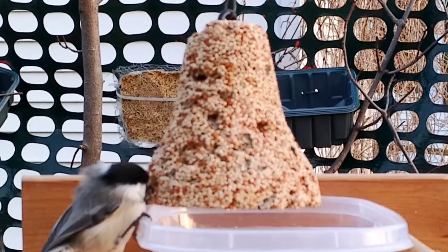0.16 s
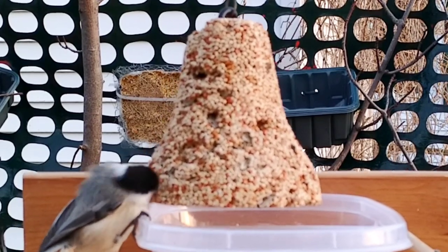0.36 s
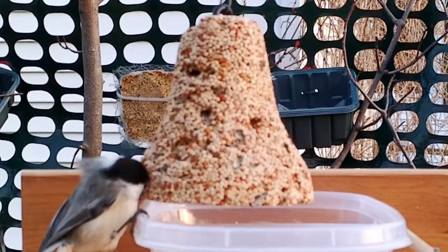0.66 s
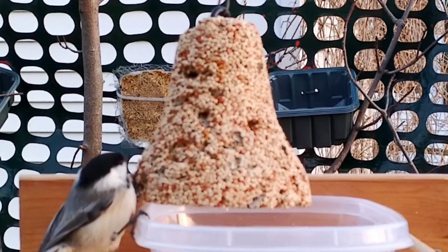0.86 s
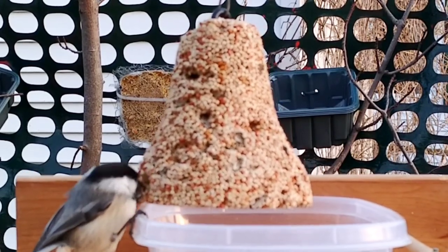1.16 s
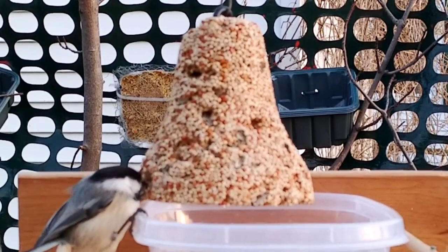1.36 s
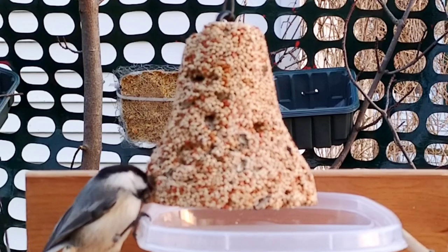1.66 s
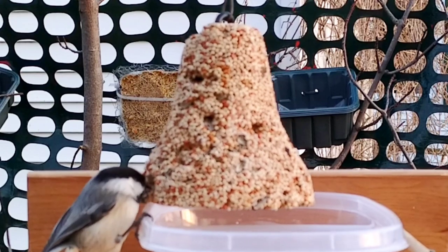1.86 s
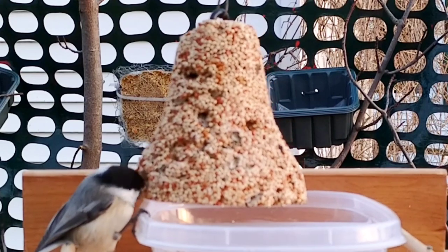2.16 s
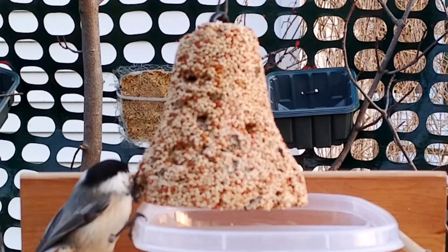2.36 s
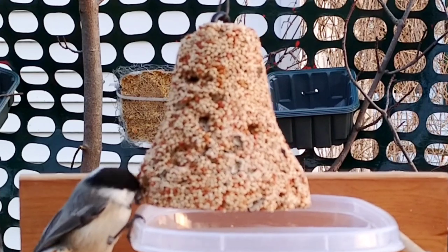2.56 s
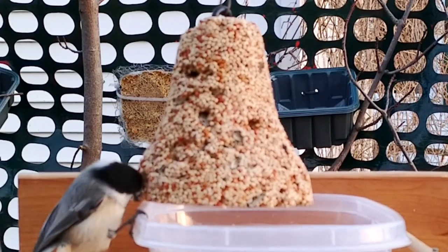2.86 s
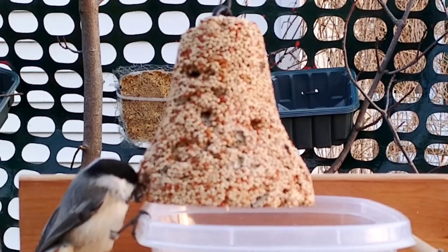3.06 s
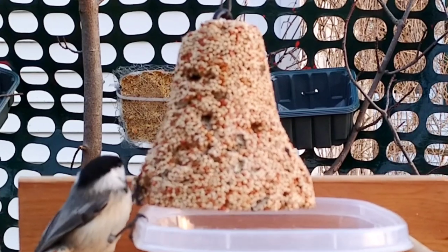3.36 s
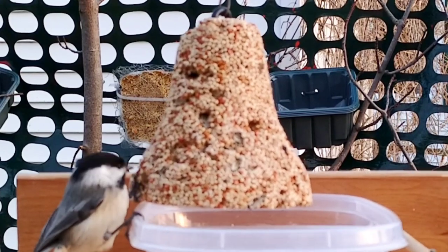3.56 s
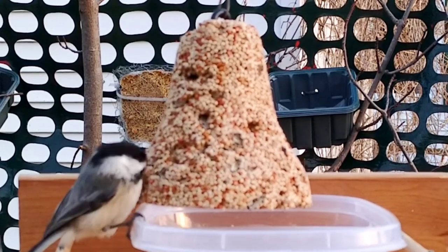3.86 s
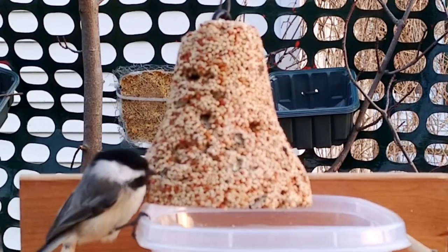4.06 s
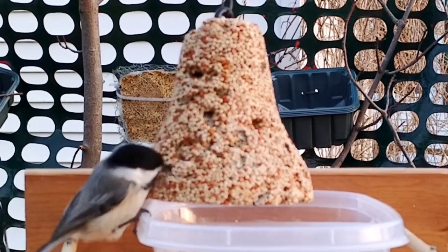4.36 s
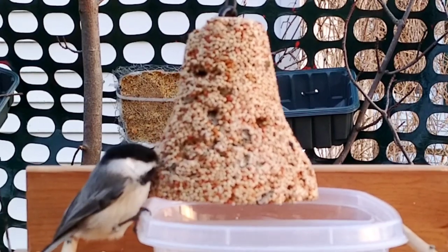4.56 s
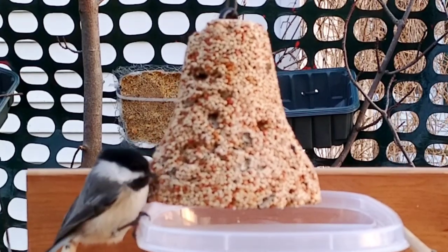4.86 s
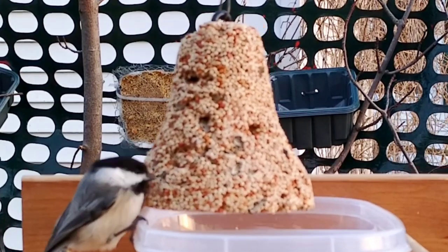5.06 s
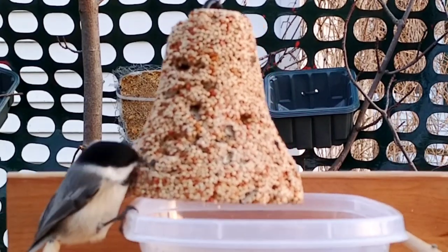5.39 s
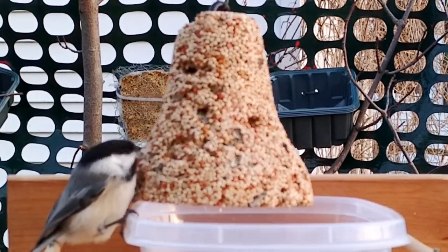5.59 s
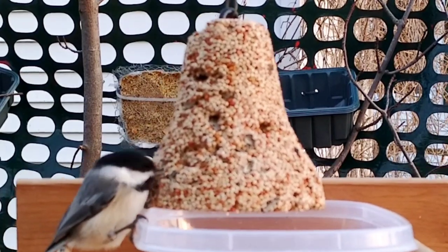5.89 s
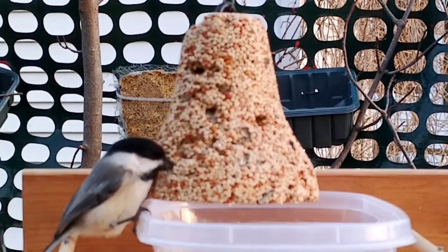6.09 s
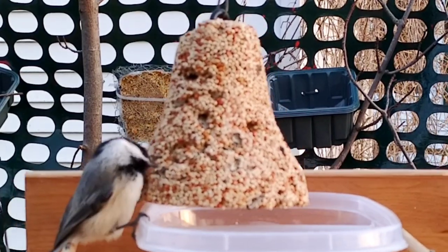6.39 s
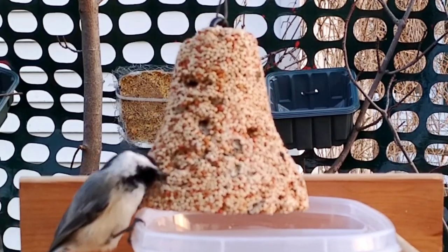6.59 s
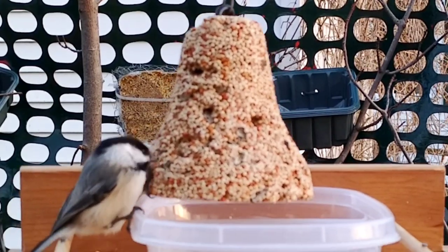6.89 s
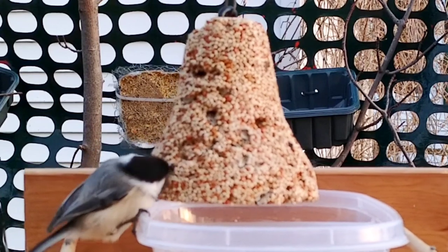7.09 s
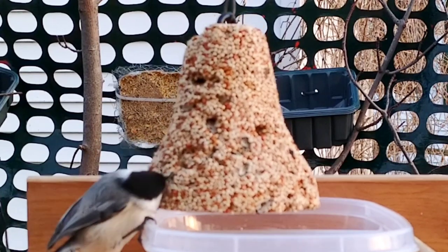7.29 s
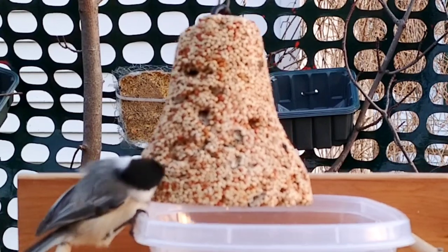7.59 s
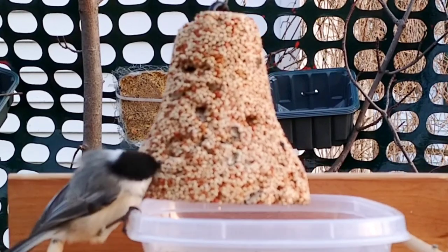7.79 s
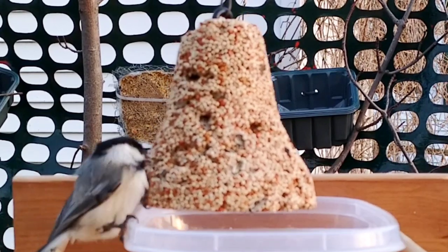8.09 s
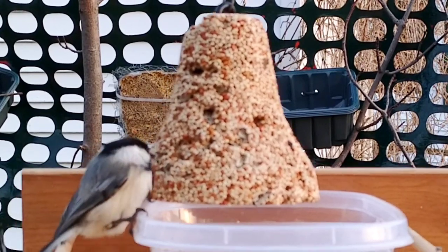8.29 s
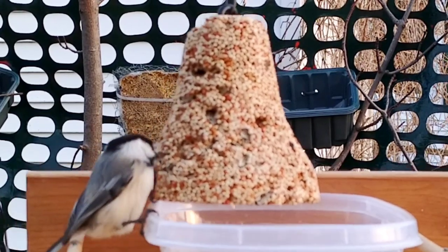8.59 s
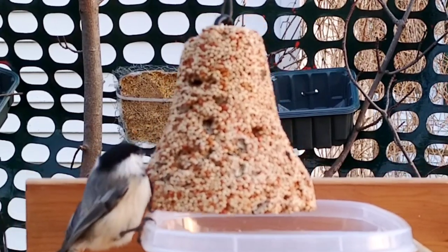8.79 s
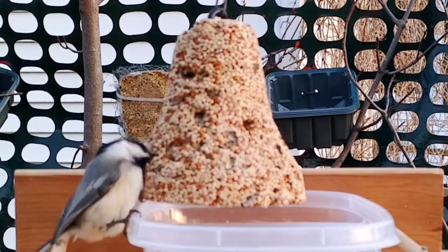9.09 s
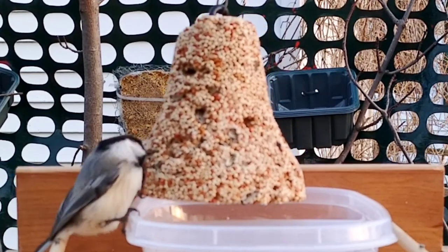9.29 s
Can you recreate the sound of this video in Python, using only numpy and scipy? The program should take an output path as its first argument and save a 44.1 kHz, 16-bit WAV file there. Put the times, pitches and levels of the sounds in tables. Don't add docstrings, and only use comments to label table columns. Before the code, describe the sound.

A chickadee-type bird and neighbours around a seed feeder: isolated piercing chips first, with a brief low wind rumble, then sweet high-low whistles farther off and quick runs of faint falling notes. Near the end come four fast downward slides and three harsh rasping buzzes, the loudest sounds, then distant chirps again. Fences and walls add short echoes; quiet traffic, leaves and dry seed ticks sit behind, with noise reduction pumping the background.

```python
import sys
import numpy as np
from scipy import signal
from scipy.fft import rfft, irfft, next_fast_len
from scipy.io import wavfile
from scipy.ndimage import uniform_filter1d

SR = 44100
rng = np.random.default_rng(int(sys.argv[2]) if len(sys.argv) > 2 else 0)


def volts_from_decibels(level):
    exponent = np.asarray(level, float) / 20
    return 10 ** exponent


def inscribe(sig):
    pcm = np.round(np.clip(np.atleast_2d(sig).T, -1, 1) * 32767)
    wavfile.write(sys.argv[1], SR, pcm.astype(np.int16))


N = 416744
TIME = np.arange(N) / SR


def colour(x, points):
    hz, db = np.transpose(points)
    n = next_fast_len(len(x), True)
    f = np.log(np.arange(n // 2 + 1) * SR / n + 1)
    return irfft(rfft(x, n) * volts_from_decibels(np.interp(f, np.log(hz), db)), n)[:len(x)]


def walk(rate):
    k = int(SR / rate)
    steps = np.repeat(rng.standard_normal(N // k + 1), k)
    return 1.337 * uniform_filter1d(uniform_filter1d(steps, k), k)[:N]


def add(out, start, hz, gain, overtone_db, ratio=2):
    phase = 2 * np.pi * np.cumsum(hz) / SR
    i = int(start * SR)
    note = gain * (np.sin(phase) + volts_from_decibels(overtone_db) * np.sin(ratio * phase))
    out[i:i + len(hz)] += note[:N - i]


def span(start, end):
    return np.linspace(0, 1, int((end - start) * SR))


def slap(x, delay_s, db):
    return x + volts_from_decibels(db) * np.roll(x, int(delay_s * SR))


def echoes(x, early_db, early_t60, late_db, late_t60):
    t = TIME[:SR]
    sparse = rng.standard_normal(SR) * (rng.random(SR) < .05) * volts_from_decibels(-60 * t / early_t60)
    dense = rng.standard_normal(SR) * volts_from_decibels(-60 * t / late_t60) * np.minimum(t / 0.042, 1)
    tail = volts_from_decibels(early_db) * sparse / np.linalg.norm(sparse) + volts_from_decibels(late_db) * dense / np.linalg.norm(dense)
    tail = colour(tail, [(8200, 0.5), (11000, -5), (15000, -9)])
    return x + signal.fftconvolve(x, tail)[:N]


def chips(table, bottom, drop_s=0.0081, drop_db=-9.5, climb=3.6, bend=1.3):
    out = np.zeros(N)
    for start, drop, hz0, top, db in table:
        u, v = span(start, drop), span(0, drop_s)
        rise_hz = top - (top - hz0) * (1 - u) ** climb
        drop_hz = top * (1 - (1 - bottom) * v ** bend)
        swell = np.minimum(u / .08, 1) * np.minimum(.4 + u / .7, 1) * (1 - .3 * u ** 3)
        fall = volts_from_decibels(drop_db + 0.26 * (db + 27.5)) * (1 - v ** 2.6)
        shape = uniform_filter1d(np.r_[swell, fall], size=64)
        octave_db = np.r_[-30 + 14 * u, -25 + 17 * v] + .9 * (db + 28)
        add(out, start, np.r_[rise_hz, drop_hz], volts_from_decibels(db) * shape, octave_db)
    return out


def notes(table, peak, sharp, overtone_db, ratio=2):
    out = np.zeros(N)
    for start, end, a, b, c, db in table:
        u = span(start, end)
        hz = a * (1 - u) * (1 - 2 * u) + 4 * b * u * (1 - u) + c * u * (2 * u - 1)
        shape = np.sin(np.pi * u ** (np.log(.5) / np.log(peak))) ** sharp
        add(out, start, hz, volts_from_decibels(db) * shape, overtone_db - 70 * np.abs(u - .36), ratio)
    return out


def even_glides(table):
    return [(s, e, a, (a + c) / 2, c, db) for s, e, a, c, db in table]


def whistles(table, lift_hz, settle_s, sag_hz_s, slope_db, catch_db):
    out, waver = np.zeros(N), walk(27.26)
    for start, end, hz, db, peak in table:
        u = span(start, end)
        t, i = u * (end - start), int(start * SR)
        edge = np.clip(np.minimum(t / 3, end - start - t) / 0.0033, 0, 1)
        catch = catch_db * np.exp(-((t - .105) / 0.029) ** 2)
        level_db = db - slope_db * np.abs(u - peak) - catch
        settling = lift_hz * np.exp(-(t / settle_s) ** 1.5)
        pitch = hz + settling - sag_hz_s * t + 14 * waver[i:i + len(t)]
        add(out, start, pitch, np.sqrt(2) * edge * volts_from_decibels(level_db), -40.)
    return out


def town():
    # pitch in Hz, level in dB per Hz.
    town_colour = [(30, -94.5), (100, -87.5), (250, -95.5), (400, -99), (850, -92.5), (1300, -99),
                   (1600, -97), (2200, -104), (3000, -110), (5000, -114), (7600, -112), (8500, -120),
                   (12000, -123), (15500, -130)]
    # time in seconds, level in dB.
    town_swell = [(0, -1), (.6, -2.5), (1.2, -0.5), (1.8, -1), (2.4, 0.5), (3, -1), (3.6, 0), (3.95, 0),
                  (4.3, 0), (4.6, 1), (5, -1.5), (5.6, -1), (6.2, -0.5), (6.9, 0), (7.6, -1), (8.1, 0),
                  (8.7, 0.5), (9.45, 2.5)]
    rest, out = colour(rng.standard_normal(N), town_colour) * np.sqrt(SR / 2), 0
    for edge in 350 * 2 ** np.arange(4):
        low = signal.lfilter(*signal.butter(1, edge, fs=SR), rest)
        out = out + low * volts_from_decibels(1.92 * walk(11) + .7 * walk(4))
        rest = rest - low
    out = out + rest * volts_from_decibels(2. * walk(11))
    return out * volts_from_decibels(np.interp(TIME, *np.transpose(town_swell)) + 1.3 * walk(9))


def wind():
    # time of the peak in seconds, level in dB, fading in dB per second.
    gust_table = [
        (0.682, -34, 135.5),
        (0.89, -31, 150.5),
        (1.1, -42, 17),
        (1.71, -51, 68),
        (3.68, -50, 31.5),
        (4.32, -51.5, 250),
        (4.6, -56, 7),
    ]
    # pitch in Hz, level in dB.
    wind_colour = [(20, -32.5), (45, -8), (95, -1.5), (150, -4.5), (230, -18.5), (330, -34), (420, -43),
                   (490, -27.5), (570, -52), (2000, -110)]
    rise_db_s, breeze_db, lull_s = 119.5, -64.5, 1.324
    power = volts_from_decibels(2 * breeze_db)
    for peak_s, db, fade_db_s in gust_table:
        lull_db = (peak_s < lull_s) * 140 * np.maximum(TIME - lull_s, 0)
        fading_db = fade_db_s * (TIME - peak_s) + lull_db
        power = power + volts_from_decibels(2 * (db - np.maximum(rise_db_s * (peak_s - TIME), fading_db)))
    puffs = colour(rng.standard_normal(N) * volts_from_decibels(2.55 * walk(18)), wind_colour)
    return puffs / puffs.std() * np.sqrt(power) * volts_from_decibels(-1.5)


def flock():
    # middle pitch in Hz, width in Hz, level in dB.
    flock_bands = [(2500, 170, -84), (3400, 410, -77), (4200, 740, -88.5), (5150, 350, -86.5),
                   (6300, 500, -88), (7400, 590, -83)]
    # time in seconds, level in dB.
    flock_swell = [(0, -21), (1.6, -1), (3.2, -16.5), (3.8, 0.5), (4.2, 6), (4.9, 10), (5.5, 2), (6, -8),
                   (6.5, 3.5), (7.3, 7), (8.7, 7.5), (9.45, 1.5)]
    out = 0
    for hz, width, db in flock_bands:
        band = colour(rng.standard_normal(N), [(hz - 3 * width, -60), (hz, 0), (hz + 3 * width, -60)])
        out = out + band / band.std() * volts_from_decibels(db + 5.0 * walk(14) + 3.5 * walk(2.994))
    return out * volts_from_decibels(np.interp(TIME, *np.transpose(flock_swell)))


def blurred():
    # start in seconds, end in seconds, first pitch in Hz, last pitch in Hz, peak in dB.
    blurred_table = [(2.283, 2.312, 8400, 4600, -57), (2.352, 2.382, 7000, 4500, -57),
                     (1.845, 1.87, 8000, 5200, -64), (9.043, 9.1, 2380, 2520, -52),
                     (0.019, .1, 4040, 4150, -63), (1.2, 1.35, 7050, 6900, -75),
                     (1.362, 1.388, 3750, 3680, -60.5), (1.864, 2.096, 2610, 2500, -66.5),
                     (2.148, 2.24, 5080, 5020, -71), (2.24, 2.467, 2470, 2360, -68.5),
                     (3.28, 3.307, 8700, 8500, -54), (3.444, 3.477, 5550, 5460, -65.5),
                     (4.39, 4.5, 3430, 3400, -68), (4.598, 4.667, 2410, 2400, -63.5),
                     (5.7, 6.102, 5170, 5130, -72.5), (7.135, 7.19, 5270, 5160, -64),
                     (7.197, 7.35, 6040, 5800, -65), (7.27, 7.57, 5180, 5060, -65),
                     (9.354, 9.385, 3950, 3800, -60), (0.0, 0.1, 7250, 7145, -52.5),
                     (0.69, 0.86, 7410, 7660, -68), (1.829, 1.986, 7400, 7600, -66.5),
                     (1.807, 2.063, 5150, 5000, -68.5), (2.828, 2.932, 8210, 7800, -58.5),
                     (4.82, 4.952, 7640, 7220, -54), (5.454, 5.475, 9100, 8930, -56.5),
                     (5.506, 5.611, 8100, 7830, -61), (7.873, 7.927, 7850, 7800, -60),
                     (6.456, 6.558, 3985, 3950, -57), (6.671, 6.751, 4030, 3930, -52.5)]
    return notes(even_glides(blurred_table), 0.15, 0.52, -31.0) * (0.38 + walk(380))


def rasps():
    # start in seconds, end in seconds, pitch in Hz, level in dB.
    rasp_table = [
        (3.83, 3.99, 430, -81),
        (4.047, 4.2, 432, -78),
        (4.5, 4.66, 431, -78),
        (4.76, 4.883, 350, -78),
        (4.985, 5.1, 347, -76),
    ]
    out, waver = np.zeros(N), walk(30)
    for start, end, hz, db in rasp_table:
        u, i = span(start, end), int(start * SR)
        pitch = hz * (1 + 0.027 * np.sin(np.pi * u) - .02 * u + 0.0073 * waver[i:i + len(u)])
        for k in range(6, 20):
            tilt_db = -12 * np.log2(k * hz / 4800) ** 2 / 0.5 + 3.9 * rng.standard_normal()
            add(out, start, k * pitch, volts_from_decibels(db + tilt_db) * np.sin(np.pi * u) ** 0.45, -60.)
    return slap(out, .043, -2.) * volts_from_decibels(6.3 * walk(55))


def far_slides():
    # start in seconds, end in seconds, middle pitch in Hz, peak in dB.
    low_slides = [(0.13, 0.166, 2890, -64), (2.672, 2.689, 2900, -61.5), (0.274, 0.317, 3360, -52.5),
                  (0.393, 0.43, 3280, -54.5), (0.514, 0.548, 3320, -56), (1.637, 1.677, 2730, -59.5),
                  (1.779, 1.829, 3380, -56), (3.677, 3.709, 2830, -61.5), (3.813, 3.855, 3330, -50),
                  (3.91, 3.955, 3400, -46), (4.01, 4.07, 3270, -50.5), (4.132, 4.177, 3400, -50),
                  (4.272, 4.319, 3190, -54), (6.465, 6.523, 3400, -52.5), (6.597, 6.642, 3340, -50.7),
                  (6.741, 6.772, 3300, -57), (6.884, 6.911, 2610, -61), (8.249, 8.294, 3380, -45.5),
                  (8.367, 8.413, 3330, -47.5), (8.463, 8.52, 3310, -48), (8.596, 8.633, 3256, -45.5),
                  (8.706, 8.771, 3210, -47.5)]
    # start in seconds, end in seconds, first pitch in Hz, last pitch in Hz, peak in dB.
    high_slides = [
        (1.122, 1.15, 8700, 8200, -69),
        (8.916, 8.934, 7950, 8500, -54),
        (5.679, 5.713, 5810, 5070, -62),
        (6.606, 6.634, 8050, 6920, -59.5),
        (6.731, 6.779, 9200, 6760, -62.5),
        (8.91, 8.951, 7980, 5280, -45),
        (9.174, 9.185, 8360, 5800, -56),
    ]
    fall_oct_s, early_share = 9.4, .56
    rows = even_glides(high_slides)
    for s, e, hz, db in low_slides:
        octaves = fall_oct_s * (e - s)
        rows.append((s, e, hz * 2 ** (early_share * octaves), hz, hz / 2 ** ((1 - early_share) * octaves), db))
    return notes(rows, 0.46, 0.51, -25.5)


def far_chips():
    # start in seconds, drop in seconds, first pitch in Hz, top pitch in Hz, peak in dB.
    far_table = [
        (2.28, 2.303, 7400, 7860, -52),
        (2.342, 2.382, 7400, 7740, -48),
        (3.071, 3.088, 6200, 7170, -50),
        (3.548, 3.599, 6200, 7740, -49),
        (3.741, 3.773, 5920, 6620, -49.5),
        (5.819, 5.836, 7130, 7430, -50),
        (6.251, 6.284, 7000, 7445, -48),
        (6.35, 6.363, 6100, 6390, -49),
    ]
    # start in seconds, end in seconds, first pitch in Hz, top pitch in Hz, peak in dB.
    lisp_table = [(2.818, 2.866, 7273, 8382, -49), (2.867, 2.91, 6230, 8000, -50),
                  (2.956, 2.968, 5650, 6900, -50), (3.158, 3.18, 6500, 6880, -52.5),
                  (6.024, 6.061, 6500, 7570, -50), (6.161, 6.199, 6300, 7480, -53),
                  (6.966, 7.007, 6940, 7780, -51.5), (7.105, 7.131, 6750, 7790, -45),
                  (7.618, 7.659, 6840, 8300, -49), (9.192, 9.221, 6500, 7630, -38.5),
                  (9.358, 9.397, 6700, 7850, -46.5)]
    out = chips(far_table, .74) + chips(lisp_table, .88, climb=2.2)
    return slap(out * volts_from_decibels(3.2 * walk(260)), .0045, -7.5)


def song():
    # start in seconds, end in seconds, pitch in Hz, peak in dB, place of the peak 0-1.
    high_whistles = [
        (0.55, 0.87, 3980, -59, 0.6),
        (1.665, 2.09, 3695, -46.5, 0.54),
        (3.61, 3.9, 3880, -63.5, 0.5),
        (4.77, 5.18, 3710, -46, 0.8),
        (7.75, 8.135, 3726, -45.5, 0.58),
    ]
    # start in seconds, end in seconds, pitch in Hz, peak in dB, place of the peak 0-1.
    low_whistles = [
        (0.0, 0.12, 3430, -57, 0.02),
        (1.01, 1.46, 3467, -59, 1),
        (2.2, 2.39, 3211, -50.5, 0.26),
        (2.41, 2.65, 3252, -51.5, 0.33),
        (5.29, 5.47, 3162, -51, 0.57),
        (5.51, 5.75, 3215, -49, 0.29),
        (8.37, 8.68, 3233, -53.5, 0.86),
    ]
    out = whistles(high_whistles, 220, .1, 150, 13., 4.) + whistles(low_whistles, -58.5, .04, 25.3, 7.8, 0.)
    return out * volts_from_decibels(1.2 * walk(40))


def held():
    # start in seconds, end in seconds, pitch in Hz, peak in dB.
    steady_table = [(0.0, 0.083, 7200, -52), (2.624, 2.652, 4200, -65), (4.084, 4.174, 2610, -65),
                    (4.245, 4.317, 2530, -67.5), (4.42, 4.479, 2470, -63), (5.67, 5.728, 2194, -63),
                    (5.794, 5.86, 2600, -63.5), (8.0, 8.307, 2765, -64), (8.085, 8.116, 2770, -60),
                    (8.807, 9.118, 5390, -67), (8.803, 9.12, 3450, -65.5), (8.978, 8.999, 3760, -47),
                    (9.158, 9.44, 5360, -66.5), (9.202, 9.44, 3430, -62)]
    # start in seconds, end in seconds, first pitch in Hz, last pitch in Hz, peak in dB.
    glide_table = [(0.585, 0.75, 8190, 7950, -75), (0.835, 0.872, 3900, 3620, -62),
                   (5.275, 5.3, 3500, 2950, -58), (1.196, 1.239, 4290, 3900, -67),
                   (1.12, 1.26, 4270, 3740, -63), (1.24, 1.4, 3760, 3520, -63),
                   (8.27, 8.46, 8100, 7620, -52), (4.512, 4.651, 3650, 3840, -59.5),
                   (2.198, 2.255, 3630, 3610, -60), (6.5, 6.6, 2500, 2580, -64),
                   (9.0, 9.045, 1850, 2100, -66), (6.98, 7.023, 3000, 2850, -57),
                   (7.858, 7.895, 5100, 4850, -55), (8.931, 8.976, 1560, 1745, -60)]
    # start in seconds, end in seconds, middle pitch in Hz, sag in Hz (negative: arch), peak in dB.
    dip_table = [
        (6.483, 6.508, 3266, -200, -55),
        (7.161, 7.207, 2650, 130, -54.5),
        (7.327, 7.388, 2580, 205, -53),
        (7.501, 7.546, 2520, 117, -54.5),
        (7.687, 7.745, 2380, 223, -60),
        (8.98, 9.014, 3214, 288, -48.5),
    ]
    ends = 1 - .012
    rows = [(s, e, hz * ends, hz, hz * ends, db) for s, e, hz, db in steady_table]
    rows += even_glides(glide_table)
    rows += [(s, e, hz + sag, hz, hz + sag, db) for s, e, hz, sag, db in dip_table]
    return notes(rows, 0.41, 0.21, -35.0) * volts_from_decibels(4.25 * walk(90))


def swoops():
    # start in seconds, end in seconds, pitch in Hz, peak in dB, place of the peak 0-1.
    swoop_table = [
        (8.697, 8.836, 7886, -40, 0.62),
    ]
    return whistles(swoop_table, 750, .022, 0., 16.0, 0.) * volts_from_decibels(2 * walk(60))


def pecks():
    # time in seconds, peak in dB.
    peck_table = [
        (2.2986, -52),
        (2.368, -53),
        (3.447, -48),
        (3.283, -48),
        (8.98, -58),
        (5.888, -49),
        (6.1238, -46),
        (7.259, -38),
        (7.585, -44),
    ]
    out, t = np.zeros(N), TIME[:SR // 50]
    for s, db in peck_table:
        i = int(s * SR)
        out[i:i + len(t)] += volts_from_decibels(db - 11) * rng.standard_normal(len(t)) * np.exp(-t / .003)
    return colour(out, [(1000, -21), (4500, -4), (7000, 22.0), (10000, 3.0)])


def close_slides():
    # start in seconds, peak in dB.
    slide_table = [
        (6.805, -25),
        (7.01, -24),
        (7.188, -23.5),
        (7.365, -24),
    ]
    rows = [(s, s + 0.051, 4950, 3950, 3400, db) for s, db in slide_table]
    return slap(slap(notes(rows, 0.55, 2.7, -24.0, ratio=1.377), .031, -15), 0.021, -23.5)


def lead_ins():
    # start in seconds, end in seconds, first pitch in Hz, last pitch in Hz, peak in dB.
    lead_table = [
        (7.488, 7.584, 7150, 7060, -30),
        (7.896, 7.989, 7070, 6930, -28.5),
        (8.302, 8.404, 7037, 6956, -29.5),
    ]
    half_s, flick_hz, flick_db = .009, 323, -12
    body, flick = [], []
    for s, e, a, c, db in lead_table:
        body.append((s, e, a, a - .5 * (c - a), c, db))
        flick.append((e - half_s, e + half_s, c, c + 0.69 * flick_hz, c + flick_hz, db + flick_db))
    return (notes(body, 0.53, 1.25, -21.5) + notes(flick, 0.33, 1.0, -29.0)) * volts_from_decibels(3.7 * walk(70))


def buzzes():
    # start in seconds, end in seconds, middle pitch in Hz, peak in dB.
    buzz_table = [
        (7.585, 7.843, 4980, -24.5),
        (7.99, 8.237, 4960, -19),
        (8.4, 8.633, 4854, -23),
    ]
    # pitch in Hz, level in dB.
    throat = [(3600, -13), (4300, -7), (4850, -19.5), (5550, -2), (6000, -5.5), (6500, -19), (7500, -39)]
    swing_hz, warble_hz, slowing_hz_s, rise_hz_s = 633, 186.3, 50.6, 400
    out, waver, wobble = np.zeros(N), walk(80), walk(240)
    f, gain_db = np.transpose(throat)
    for start, end, centre, db in buzz_table:
        u = span(start, end)
        t, i = u * (end - start), int(start * SR)
        wobble_hz = wobble[i:i + len(u)]
        rate = (warble_hz - slowing_hz_s * t) * (1 + .025 * waver[i:i + len(u)])
        turn = 2 * np.pi * np.cumsum(rate) / SR
        warble = np.tanh(3.21 * np.sin(turn) + .35) + 0.073 * np.sin(2 * turn)
        swing = swing_hz * warble * np.minimum(0.34 + t / 0.074, 1)
        onset = 1900 * np.exp(-t / 0.012)
        hz = centre + rise_hz_s * (t - .15) + onset + swing + 55 * wobble_hz
        shape = np.minimum(t / 0.082, 1) ** 1.1 * (1 - 0.83 * u ** 1.6) * np.minimum((1 - u) / 0.067, 1)
        throat_db = uniform_filter1d(np.interp(hz, f, gain_db), size=24)
        add(out, start, hz, volts_from_decibels(db + throat_db) * shape, -32 - 20 * (hz - 4300) / 1300)
        add(out, start, 2 * centre + 450 * wobble_hz, volts_from_decibels(db - 50) * shape * (1 + np.cos(2 * turn)), -60.)
    out = colour(out, [(4500, 0), (4930, -6), (5300, 0)])
    return echoes(out, -8.5, 0.089, -19.0, 0.63)


def close_chips():
    # start in seconds, drop in seconds, first pitch in Hz, top pitch in Hz, peak in dB.
    chip_table = [
        (0.909, 0.958, 6630, 7533, -28.5),
        (1.516, 1.55, 6750, 7830, -34),
        (3.273, 3.31, 6340, 7980, -38.5),
        (3.539, 3.577, 7250, 7730, -37),
        (3.655, 3.688, 6000, 7200, -41),
        (3.994, 4.053, 6960, 7550, -25.5),
        (5.109, 5.159, 7260, 7930, -37.5),
        (5.127, 5.166, 6770, 7430, -26.5),
    ]
    # start in seconds, drop in seconds, first pitch in Hz, top pitch in Hz, peak in dB.
    rounded_chips = [
        (4.374, 4.404, 6130, 6970, -38.5),
        (4.45, 4.49, 6720, 7850, -40.5),
    ]
    out = chips(chip_table, .57) + chips(rounded_chips, 0.55, .026, -1.5, 3., 2.2)
    return slap(slap(out, 0.0055, -8.5), .0027, -8.5)


def gate():
    # start in seconds, length in milliseconds.
    shut_spans = [(0.107, 59), (0.173, 106), (0.315, 150), (1.448, 65), (2.096, 105), (2.643, 180),
                  (2.982, 89), (3.116, 39), (3.189, 74), (3.361, 85), (3.475, 59), (4.345, 27), (5.742, 76),
                  (5.859, 132), (6.09, 30.7), (6.233, 40), (6.297, 48), (6.389, 83), (6.556, 49),
                  (6.653, 43), (9.127, 40), (9.327, 19), (9.441, 21)]
    blinks = [0.493, 0.551, 1.391, 1.664, 2.936, 3.895, 4.69, 4.742, 5.493, 6.134, 6.703, 6.739, 6.787,
              6.935, 9.179, 9.305, 9.348]
    db = np.zeros(N)
    spans = [(s, ms, -11.5) for s, ms in shut_spans] + [(s, 14.3, -12.5) for s in blinks]
    for start, ms, depth_db in spans:
        db[int(start * SR):int((start + ms / 1000) * SR)] = depth_db
    return volts_from_decibels(uniform_filter1d(db, int(0.0068 * SR)))


def scene():
    # pitch in Hz, level in dB.
    mic_top = [(7900, -0.5), (8600, -0.5), (10000, 1.5), (15000, -16.5), (15400, -16.5), (15600, -60)]
    far = volts_from_decibels(0.59 * walk(45)) * (far_slides() + rasps())
    birds = flock()
    birds += echoes(far_chips() + blurred(), 0.4, 0.092, -8.5, 0.48)
    birds += echoes(far, -4.5, 0.14, -7.5, 0.72)
    birds += echoes(song(), -7.0, 0.14, -11., 0.73)
    birds += echoes(held() + lead_ins() + swoops(), -11.0, 0.2, -10.0, 0.56)
    birds += echoes(pecks(), -5., .04, -16., .3)
    birds += echoes(close_slides(), -11.5, 0.098, -19.0, 0.76)
    birds += buzzes()
    birds += echoes(close_chips(), -3.5, 0.12, -14.5, 0.45)
    shut = gate()
    return (shut * (colour(birds, mic_top) + town()) + shut ** 1.26 * wind())[None]


def top_cut(x):
    return signal.sosfilt(signal.butter(12, 15500, fs=SR, output="sos"), x)


def record(dry):
    return top_cut(dry)


dry = scene()
out = record(dry)
inscribe(out)
```